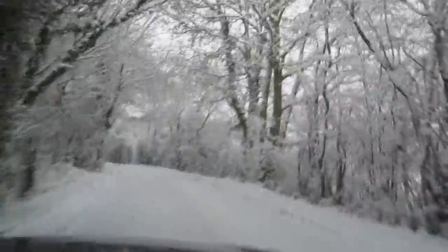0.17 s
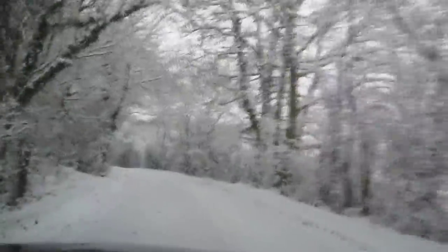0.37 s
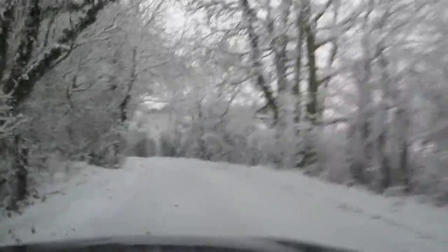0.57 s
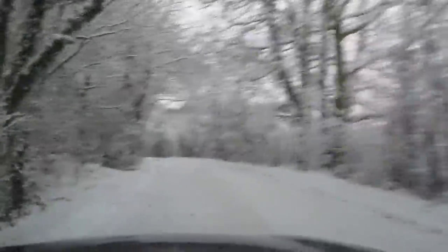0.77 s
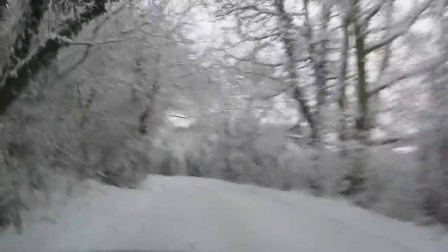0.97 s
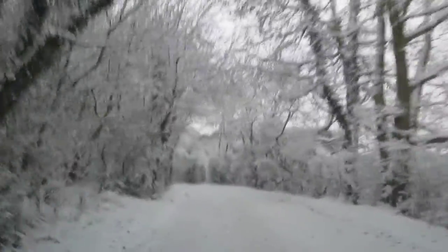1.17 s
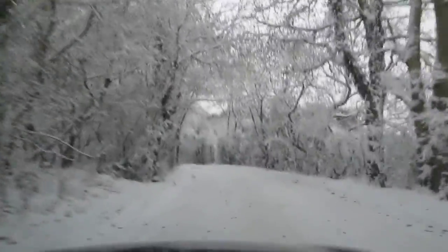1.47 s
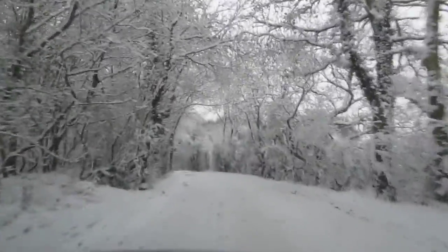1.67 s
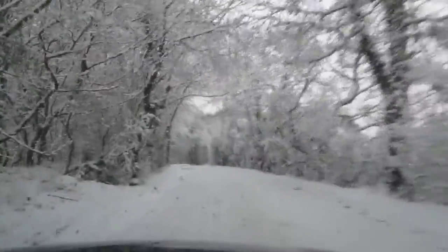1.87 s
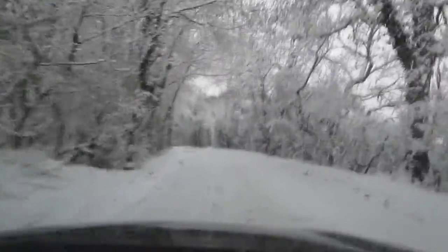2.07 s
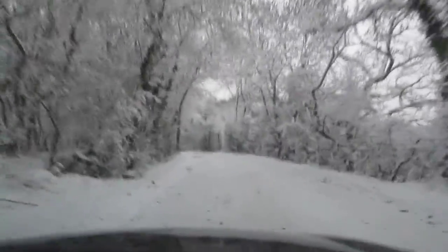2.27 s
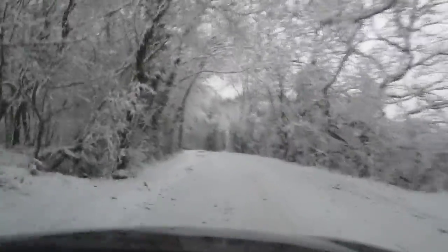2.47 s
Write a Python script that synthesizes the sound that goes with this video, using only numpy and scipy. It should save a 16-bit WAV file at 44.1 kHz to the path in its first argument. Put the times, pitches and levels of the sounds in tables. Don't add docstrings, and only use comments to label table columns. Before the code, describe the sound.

Low car rumble heard from inside a small dry cabin, microphone close to the trim; ruts thud irregularly, the engine hums steadily, tyres crunch dully through the floor, and plastic parts tick and scrape.

```python
import sys
import numpy as np
from scipy import signal
from scipy.fft import rfft, irfft
from scipy.io import wavfile
from scipy.ndimage import uniform_filter1d

SR = 44100
rng = np.random.default_rng(int(sys.argv[2]) if len(sys.argv) > 2 else 0)


def file_out(sig):
    cols = np.atleast_2d(sig).T
    lim = np.clip(cols, -1, 1)
    pcm = np.round(lim * 32767).astype(np.int16)
    wavfile.write(sys.argv[1], SR, pcm)


def gain_from_decibels(decibels):
    exponent = np.asarray(decibels, float) / 20
    return 10 ** exponent


N = 115101


def level(x, db):
    return x * gain_from_decibels(db) / np.sqrt(np.mean(x ** 2))


def curve(table, axis):
    points = np.array(table)
    return np.interp(np.arange(N) / SR, points[:, 0], points[:, axis])


def walk(rate):
    hold = int(SR / rate)
    steps = np.repeat(rng.standard_normal(N // hold + 1), hold)
    return uniform_filter1d(uniform_filter1d(steps, hold), hold)[:N]


def colour(x, points):
    hz, db = np.log(np.array(points)[:, 0]), np.array(points)[:, 1]
    edge = np.log(1.12)
    hz = np.r_[hz[0] - edge, hz, hz[-1] + edge]
    db = np.r_[db[0] - 40, db, db[-1] - 40]
    f = np.log(np.arange(N // 2 + 1) * SR / N + 1e-3)
    gain_db = np.interp(f, hz, db, -200, -200)
    return level(irfft(rfft(x) * gain_from_decibels(gain_db), N), 0)


def noise(points, flicker_db, rate):
    return colour(rng.standard_normal(N) * gain_from_decibels(flicker_db * walk(rate)), points)


def broad_peak(size, centre_hz, width_octaves, dull_hz):
    octaves = np.log2(np.arange(size // 2 + 1) * SR / size + 1)
    peak = np.exp(-.5 * ((octaves - np.log2(centre_hz)) / width_octaves) ** 2)
    return peak / (1 + (2 ** octaves / dull_hz) ** 8)


def panel_blows(table, rise_s, gain_db):
    out, t = 0, np.arange(N) / SR
    for s, db, hz in table:
        age = np.maximum(t - s, 0) / rise_s
        swell = age * np.exp(1 - age)
        out = out + gain_from_decibels(db + gain_db) * swell * np.sin(2 * np.pi * (hz * t + rng.random()))
    return out


def even_rumble(points, drive_db):
    x = colour(rng.standard_normal(N), points)
    power = uniform_filter1d(x ** 2, int(.06 * SR))
    x = x / np.sqrt(power + 0.015) * gain_from_decibels(drive_db)
    rms = np.sqrt(np.mean(x ** 2))
    return colour(x, [(10, 13.3), (20, 4.6), (135, 10.7)]) * rms


# (pitch [Hz], level [dB rms])
WHINE = [(7732, -86), (7792, -85), (7822, -86), (7852, -78), (7882, -74), (7942, -81), (8001, -83),
         (8062, -85), (8091, -87)]


def whine():
    t = np.arange(N) / SR
    return sum(np.sqrt(2) * gain_from_decibels(db) * np.sin(2 * np.pi * (hz * t + rng.random())) for hz, db in WHINE)


# (frequency [Hz], level [dB per Hz])
HISS = [(5500, -7.5), (6800, -3.5), (8500, -4.5), (9800, -3.5), (12000, -17), (15800, -24)]


def steady_hiss():
    return gain_from_decibels(-68) * noise(HISS, 0.51, 17)


# (frequency [Hz], level [dB per Hz])
RUSTLE_SPECTRUM = [(3820, -16), (6500, -8.5), (7960, -7), (8500, -3.5), (10700, -9), (11500, -13.5),
                   (15600, -25)]
# (time [s], level [dB])
RUSTLE = [(.04, -62), (.12, -65), (.2, -59), (.3, -69.5), (.7, -73.5), (.88, -63), (1.03, -66),
          (1.065, -62), (1.17, -67), (1.5, -70), (1.69, -63), (1.81, -68), (1.9, -62), (1.98, -53),
          (2.03, -64), (2.3, -64), (2.45, -61), (2.6, -61.5)]


def rustle():
    grain_db = 1.5 * rng.exponential(size=N) + 1.2 * walk(45)
    grains = rng.standard_normal(N) * gain_from_decibels(grain_db)
    return colour(grains, RUSTLE_SPECTRUM) * gain_from_decibels(curve(RUSTLE, axis=1))


# (start [s], end [s], level [dB])
SQUEAKS = [
    (0.03, 0.157, -69),
    (0.277, 0.544, -68.5),
    (.85, .96, -72),
]


def squeak():
    t = np.arange(N) / SR
    gate = 0
    for start, end, db in SQUEAKS:
        fade = np.clip(np.minimum(t - start, end - t) / .03, 0, 1)
        gate = gate + gain_from_decibels(db) * fade
    return gate * noise([(4720, -3), (5000, 0), (5280, -3)], 1.5, 25)


# (time [s], length [s], level [dB], centre [Hz])
SCRAPES = [(.266, .004, -52, 4730), (.369, .003, -59, 9500), (1.057, .005, -54, 9150),
           (1.072, .004, -52, 10900), (1.076, .007, -46, 2700), (1.117, 0.0037, -62, 8000),
           (1.148, 0.0055, -55.5, 9500), (1.151, 0.0033, -49, 2800), (1.866, .004, -54, 7700),
           (1.892, .005, -59, 8500), (1.907, .004, -59, 8000)]


def scrapes():
    out, t = 0, np.arange(N) / SR
    for s, length, db, hz in SCRAPES:
        grains = rng.standard_normal(N) * gain_from_decibels(2.5 * rng.exponential(size=N))
        band = irfft(rfft(grains) * broad_peak(N, hz, .33, 12500), N)
        out = out + level(band, db) * np.exp(-np.abs(t - s) / length)
    return out


# (time [s], ring level [dB], ring pitch [Hz], snap
# level [dB], snap centre [Hz])
TICKS = [(0.047, -43, 5440, -45, 8500), (0.2116, -39.5, 3500, -41.5, 6500), (0.264, -45, 2970, -36.5, 9000),
         (.4165, -54, 5300, -56, 6000), (0.531, -44, 5440, -40.5, 10000), (.742, -68, 5000, -52, 8000),
         (.852, -56, 9500, -42, 11600), (.94, -60, 9000, -52, 12500), (1.043, -61, 5500, -50, 7500),
         (1.059, -40.5, 4100, -42, 7000), (1.069, -50, 3800, -50, 9200), (1.0733, -32, 2600, -36, 3960),
         (1.149, -42, 2120, -40, 3117), (1.146, -58, 9550, -48, 10000), (1.2335, -54, 5460, -43.5, 10000),
         (1.556, -59, 9100, -46, 10010), (1.698, -54, 4467, -41, 6000), (1.751, -46, 3400, -50, 9000),
         (1.765, -41, 4176, -34.5, 8500), (1.786, -50, 4660, -48, 8997), (1.864, -50, 5584, -40.5, 8500),
         (1.8926, -55, 7215, -35, 10000), (2.201, -51, 12810, -45, 10500),
         (2.275, -40.5, 5460, -38.5, 8500),
         (.263, -37, 9240, -52, 5000),
    (.532, -45, 9320, -51, 9722),
    (1.149, -46, 4100, -60, 4100),
    (1.764, -43, 10100, -43, 12000),
    (1.765, -42, 5300, -44, 5000),
    (1.919, -57, 6460, -58, 6900),
    (2.029, -56, 5200, -49, 7000),
    (2.481, -45, 5250, -49, 5600),
    (2.55, -60, 4000, -49, 8980),
]


def ticks():
    size, lead = 2048, 512
    snap_s, tail_s, scuff_s, ring_t60_s = .0009, .0035, .006, .0065
    out, t = np.zeros(N + size), (np.arange(size) - lead) / SR
    after = np.maximum(t, 0)
    shape = (t >= 0) * (np.exp(-after / snap_s) + .35 * np.exp(-after / tail_s))
    shape = shape + .13 * np.exp(-np.abs(t) / scuff_s)
    ring_shape = np.exp(-np.log(1000) * after / ring_t60_s) * (1 - np.exp(-after / snap_s))
    for s, ring_db, ring_hz, snap_db, snap_hz in TICKS:
        burst = rng.standard_normal(size) * shape
        snap = irfft(rfft(burst) * broad_peak(size, snap_hz, .5, 11000), size)
        ring = ring_shape * np.sin(2 * np.pi * ring_hz * after)
        at = int(s * SR) - lead - 12
        out[at:at + size] += gain_from_decibels(snap_db) * snap / np.abs(snap).max() + gain_from_decibels(ring_db + 9) * ring
    return out[:N]


# (frequency [Hz], level [dB per Hz])
FLOOR_PAN = [(120, -13), (140, -9), (166, -5), (198, -8.5), (250, -7), (300, -14), (400, -16.5),
             (600, -16.5), (650, -35.5)]
# (time [s], level [dB])
CRUNCH = [
    (.04, -7),
    (.3, 2),
    (.45, -1.5),
    (.9, 1.5),
    (1.2, 0),
    (1.6, -1),
    (2.05, 1.5),
    (2.3, 2),
    (2.6, -2),
]


def tyres():
    return gain_from_decibels(-36 + curve(CRUNCH, axis=1)) * noise(FLOOR_PAN, 0.58, 14)


# (time [s], level [dB], pitch [Hz])
LUMPS = [(0.04, -34, 156), (0.16, -29, 132), (0.321, -25, 161), (0.404, -26, 167), (0.499, -29, 172),
         (0.633, -29, 132), (0.778, -33, 199), (0.854, -27, 167), (0.992, -26, 167), (1.151, -28, 180),
         (1.34, -28, 186), (1.565, -30, 172), (1.673, -30, 159), (1.812, -29, 164), (1.868, -30, 164),
         (2.098, -26, 170), (2.232, -31, 132), (2.398, -33, 148)]


def snow_lumps():
    return panel_blows(LUMPS, rise_s=.02, gain_db=-3)


# (time [s], turns per second [Hz])
ENGINE_HZ = [
    (0, 35.55),
    (.5, 35.37),
    (1.0, 35.27),
    (1.6, 35.56),
    (2.6, 35.5),
]
# (multiple of the turning speed, level [dB])
ORDERS_DB = [(2, -36), (3, -35), (4.5, -44.5), (5, -51), (6, -45), (8, -52), (9, -43), (13, -78), (14, -71),
             (15, -54.5), (16, -58.5), (17, -56)]
# (frequency [Hz], level [dB per Hz])
BULKHEAD = [(360, -9.5), (620, -9), (651, -7), (769, -10), (945, -3), (1050, -7.5), (1170, -8),
            (1450, -16.5), (2000, -26), (2600, -53), (4400, -120)]
# (frequency [Hz], level [dB per Hz])
CABIN = [(1120, -10.5), (1900, 0.5), (3020, 2.5), (3760, -5), (4080, -6.5), (5070, -6.5), (5540, -9.5),
         (7000, -29), (9100, -44), (15400, -120)]


def engine():
    turn = np.cumsum(curve(ENGINE_HZ, axis=1) * (1 + 0.0013 * walk(5.62))) / SR
    hum = 0
    for k, db in ORDERS_DB:
        loudness = np.sqrt(2) * gain_from_decibels(db + 0.82 * walk(7.27))
        hum = hum + loudness * np.sin(2 * np.pi * (k * turn + rng.random()))
    puff = np.exp(-(turn % 1) / 0.14) * gain_from_decibels(2.0 * walk(30.5))
    knock = 1 + 0.15 * level(puff, 0)

    def puffing(points):
        return colour(rng.standard_normal(N) * knock * gain_from_decibels(1.1 * walk(16)), points)

    return hum + gain_from_decibels(-45.5) * puffing(BULKHEAD) + gain_from_decibels(-59) * puffing(CABIN)


# (frequency [Hz], level [dB per Hz])
BODY = [(64, 0), (72, 0.5), (88, -8.5), (99, -17), (115, -15.5), (130, -25)]


def body_drone():
    return even_rumble(BODY, -27.5)


# (frequency [Hz], level [dB per Hz])
SUSPENSION = [(10, 8), (16, -21), (23, -4), (33, 5.5), (52, -3), (59, -12)]
# (time [s], level [dB])
BUMPS = [(0.05, -19), (0.12, -36), (0.16, -22.5), (0.72, -16.5), (0.75, -29.5), (0.88, -15.5),
         (0.91, -25.5), (1.46, -16.5), (1.61, -29.5), (1.66, -17), (1.85, -25), (1.89, -18.5),
         (2.07, -23.5), (2.31, -15.5), (2.35, -33), (2.46, -8), (2.49, -18.5), (2.6, -16.5)]


def suspension():
    return even_rumble(SUSPENSION, curve(BUMPS, axis=1))


# (time [s], level [dB], pitch [Hz])
THUDS = [(0.036, -13.5, 67.3), (0.137, -11, 80.8), (0.355, -18, 75.73), (0.466, -14.5, 56.77),
         (0.538, -19.5, 75.4), (0.628, -16.5, 72.4), (0.729, -17, 67.52), (0.863, -12, 61.9),
         (0.985, -27, 56.5), (1.034, -22, 56.5), (1.143, -18.5, 75.13), (1.218, -19, 69.93),
         (1.323, -16, 80.55), (1.442, -14, 64.5), (1.497, -15.5, 85.7), (1.55, -15, 80.7),
         (1.646, -18, 83.6), (1.771, -20, 56.45), (1.829, -22, 75), (1.947, -15.5, 75.6),
         (2.0, -15.5, 67.2), (2.168, -14.5, 70.05), (2.219, -19, 80.7), (2.298, -16.5, 83.4),
         (2.411, -11.5, 56.66), (2.469, -15.5, 56.5)]


def rut_thuds():
    return panel_blows(THUDS, rise_s=.017, gain_db=-2)


def scene():
    background = whine() + steady_hiss() + rustle()
    trim = squeak() + scrapes() + ticks()
    snow = tyres() + snow_lumps()
    car = engine() + body_drone() + suspension() + rut_thuds()
    return (background + trim + snow + car)[None]


def top_cut(x):
    return signal.sosfilt(signal.butter(12, 15800, fs=SR, output="sos"), x)


def record(dry):
    start_s, fade_s = 0.036, 0.00097
    opening = np.clip((np.arange(N) / SR - start_s) / fade_s, 0, 1)
    return top_cut(dry * opening)


dry = scene()
out = record(dry)
file_out(out)
```